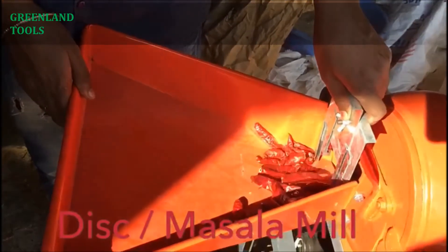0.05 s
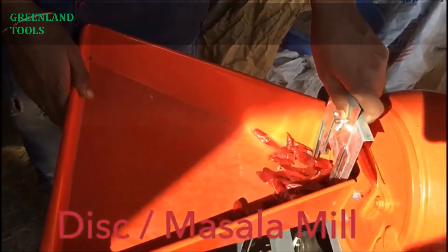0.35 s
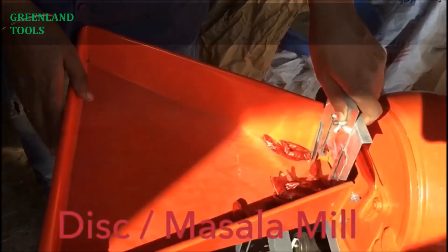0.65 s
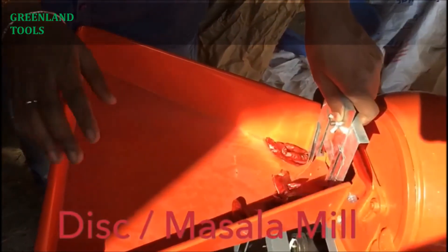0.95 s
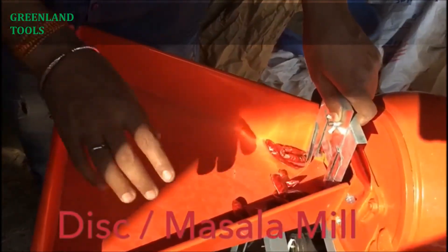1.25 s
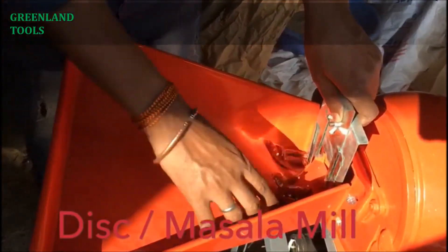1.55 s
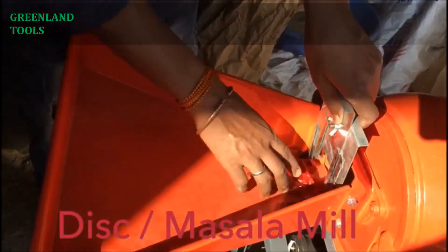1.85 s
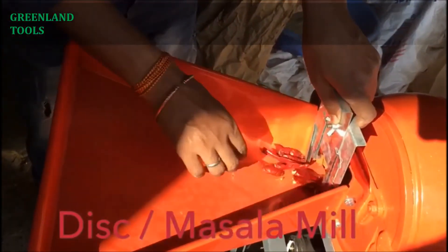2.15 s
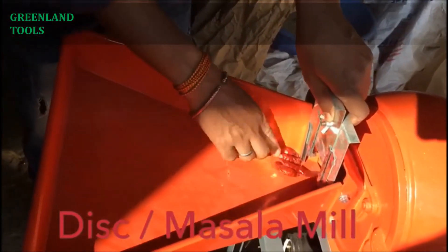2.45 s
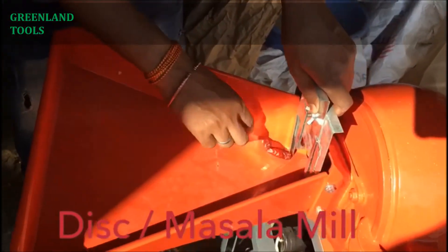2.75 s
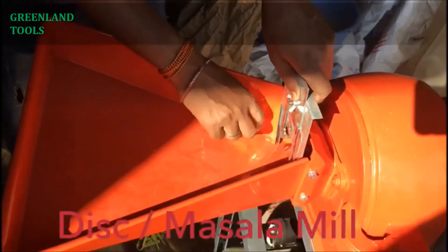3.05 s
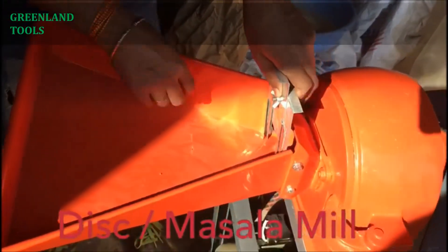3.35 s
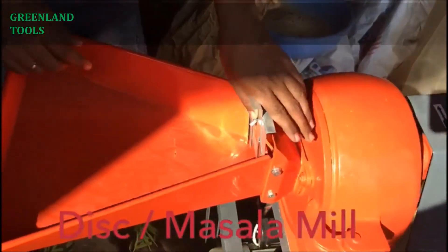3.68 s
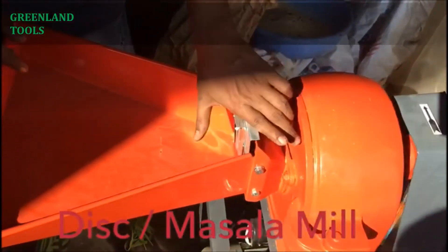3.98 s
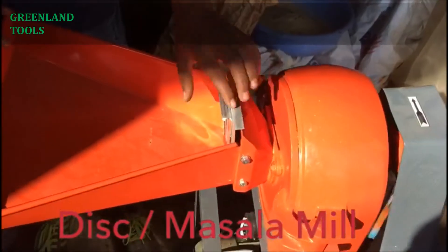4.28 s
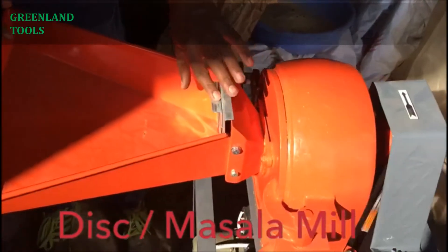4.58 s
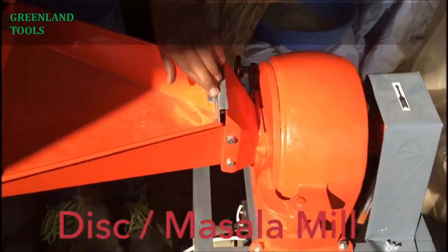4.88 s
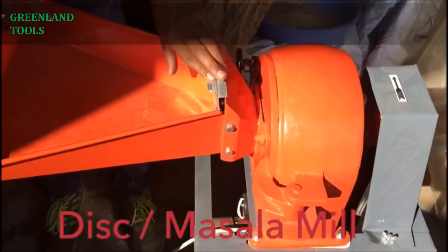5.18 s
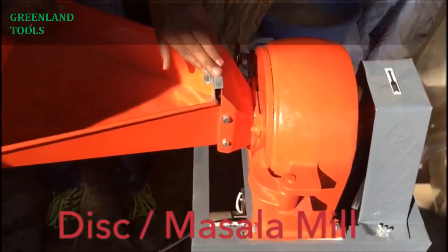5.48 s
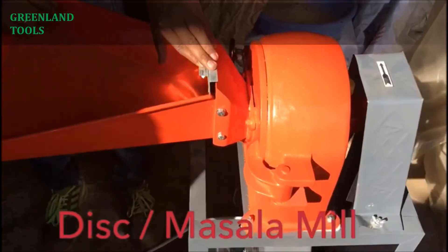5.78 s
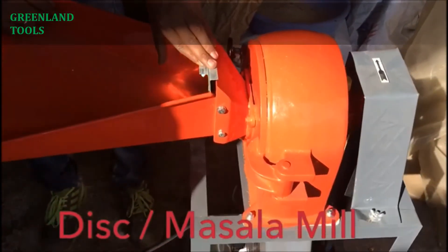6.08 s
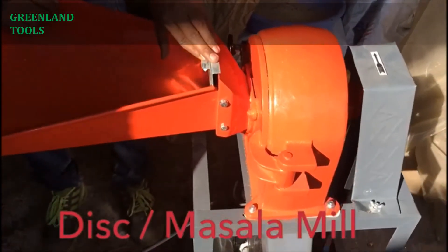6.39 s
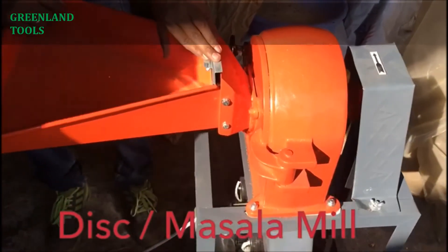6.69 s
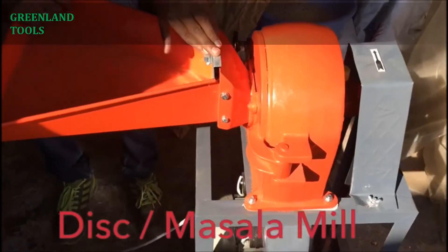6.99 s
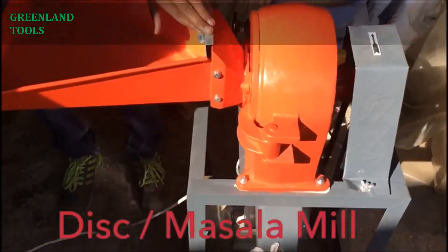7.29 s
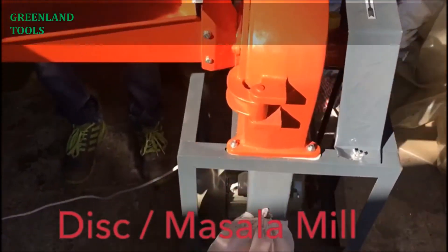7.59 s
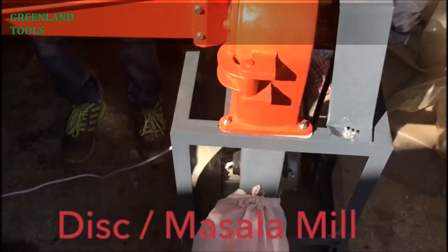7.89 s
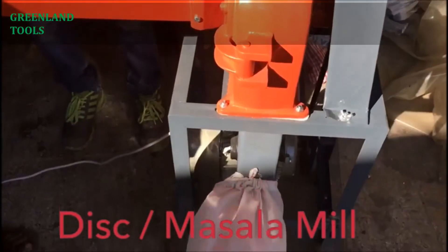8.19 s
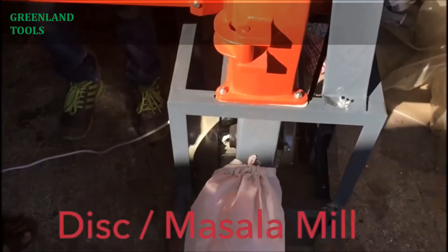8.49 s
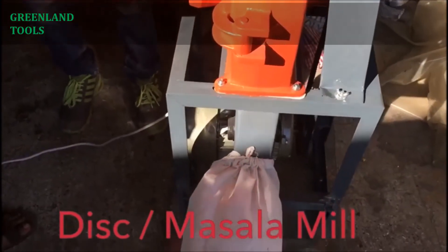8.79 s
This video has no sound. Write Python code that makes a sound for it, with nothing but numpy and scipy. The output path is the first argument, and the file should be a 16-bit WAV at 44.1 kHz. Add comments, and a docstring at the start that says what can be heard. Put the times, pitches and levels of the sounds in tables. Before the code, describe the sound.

An electric disc mill runs at full speed outdoors, with a steady motor hum, rushing air and many high whining tones. Dried chillies crunch in short bursts and fragments patter on steel for the first few seconds, then thin out, leaving the machine running nearly empty. One soft low bump comes midway. The close microphone moves along the mill, so different whines swell and fade.

```python
"""A belt-driven disc mill runs at full speed outdoors as the last dried chillies go down its hopper.
Rotor and motor hum, the bearings whine in many steady lines, and air roars through the grinding chamber.
Pods crunch and fragments patter on the steel, thinning out as the feed ends; one soft low bump sounds.
The microphone moves from above the hopper, over the housing, to the side of the frame,
passing through the peaks and nulls of each tone."""
import sys
import numpy as np
from scipy import signal
from scipy.fft import rfft, irfft
from scipy.io import wavfile
from scipy.ndimage import uniform_filter1d

SR = 44100
rng = np.random.default_rng(int(sys.argv[2]) if len(sys.argv) > 2 else 0)


def store_pcm(level_fs):
    """Save levels as 16-bit WAV."""
    pcm = np.round(np.clip(level_fs, -1, 1) * 32767).astype(np.int16)
    wavfile.write(sys.argv[1], SR, np.atleast_2d(pcm).T)


N = 394254
T = np.arange(N) / SR

# microphone move: time_s, place (0 hopper, 1 housing, 2 frame)
MIC_PATH = [(0, 0), (2.9, 0), (3.9, 1), (6.6, 1), (7.4, 2), (9, 2)]
# shaft speed, sagging a little under load: time_s, off_nominal_percent
SHAFT_SPEED = [(0, -.02), (1.6, -.01), (2.5, -.07), (3.6, 0), (6, .01), (9, .06)]
# air noise colours of the housing, the chamber and the grinding teeth: frequency_hz, relative_db
RUMBLE_EQ = [(15, -34), (30, -13), (45, -4.5), (100, -4.5), (170, -4), (250, 2.5), (310, 1), (375, 5.5),
             (430, 2.5), (490, -13), (900, -45)]
ROAR_EQ = [(300, -23.5), (480, -7), (570, -1), (760, 0.5), (980, -2), (1170, 4), (1350, -3), (1650, -1.5),
           (1870, 1.5), (2150, -3), (2800, -7), (3600, -25.5), (6000, -43)]
HISS_EQ = [(1500, -23), (2700, -8), (3300, 1.5), (3800, 2), (4300, 5), (4900, -1), (5700, -1.5),
           (6600, -5.5), (7300, -4), (8100, -2), (9200, -3), (10000, -7), (10400, -15)]
# level of the housing's rumble as the microphone moves: time_s, level_db
RUMBLE_LEVEL = [(0, -31.5), (.4, -24.5), (1.7, -29.5), (4.1, -28), (5.5, -29), (6.3, -32.5), (7.3, -29.5),
                (8.94, -32)]
# base levels of the roar and the hiss: hopper_db, housing_db, frame_db
ROAR_LEVELS = (-24.5, -24.5, -23.5)
HISS_LEVELS = (-22, -22.2, -23)
# the running gear chopping the air: rate_hz, relative_depth
AIR_CHOP = [(68.7, .06), (149.3, .07), (217.9, .1), (298.6, .09), (367.2, .12), (516.4, .07)]
# how much chilli is in the chamber: time_s, relative_db
CHILLI_FEED = [(0, 10), (.7, 10), (1.5, -18), (2.2, 6.5), (3.2, -15), (4.2, 4), (5.2, -15), (9, -38)]
# whole pods caught by the teeth: start_s, level_db
POD_CRUNCHES = [(.07, -21.5), (.19, -25), (.365, -30), (.39, -21), (.585, -21), (.676, -26), (.83, -28),
                (.975, -20), (1.135, -19), (1.31, -29), (1.955, -19), (2.125, -19), (2.415, -25),
                (2.84, -25), (3.115, -25)]
# a soft low bump: start_s, level_db, pitch_hz, rise_s
LOW_BUMP = (4.725, -22, 52, .018)
# bearing whine, before its trim: pitch_hz, hopper_db, housing_db, frame_db
BEARING_LINES = [(700, -44, -45, -42), (709, -44, -37, -39), (850, -46, -45, -43), (982, -44, -46, -45),
                 (1067, -35, -44, -37), (1191, -38, -43, -47), (1217, -41, -43, -45), (1350, -44, -45, -46),
                 (1434, -41, -41, -47), (1503, -38, -39, -37), (1567, -42, -43, -45), (1611, -40, -43, -44),
                 (1740, -40, -46, -36), (1984, -40, -48, -51), (2386, -43, -37, -47), (2502, -49, -40, -46),
                 (2755, -50, -43, -37), (2970, -44, -46, -45), (3338, -42, -38, -40), (3394, -48, -40, -41),
                 (3482, -37, -36, -40), (3528, -46, -38, -40), (3636, -39, -34, -41), (3740, -40, -39, -45),
                 (3918, -46, -39, -41), (3970, -42, -39, -39), (4071, -37, -34, -34), (4184, -36, -38, -38),
                 (4258, -37, -41, -46), (4548, -48, -48, -39), (4620, -43, -42, -44), (4739, -39, -34, -39),
                 (4917, -48, -34, -38), (4998, -44, -42, -41), (5105, -41, -39, -36), (5168, -42, -42, -47),
                 (5472, -45, -42, -42), (5539, -41, -46, -47), (7309, -53, -43, -47), (7372, -40, -45, -46),
                 (8113, -50, -43, -41), (8410, -52, -42, -44), (8847, -45, -43, -47)]
# rotor, belt and mains tones: pitch_hz, hopper_db, housing_db, frame_db
HUM_LINES = [(66.7,-47,-40.5,-41), (83.2,-41,-48,-47), (88.4,-27.5,-28.5,-30), (100.3,-37,-34,-36),
             (116.2,-44,-42.5,-48), (121.4,-38,-41,-48), (176.8,-38,-47,-57), (190.2,-45,-38,-39),
             (201.4,-52.5,-49,-42), (236,-42,-46,-50), (245,-35,-41.5,-47), (250.5,-48,-39.5,-42),
             (266,-28,-28.5,-32), (274.2,-30.5,-41,-53), (331.7,-33,-43,-53), (353.3,-42,-35.5,-34.5),
             (361.3,-34,-34.5,-41), (402,-40,-43.5,-56), (550,-51,-41.5,-40), (581.7,-45,-39.5,-43.5)]
# the mill's lead tones between swells, by name: pitch_hz, hopper_db, housing_db, frame_db
LEAD_LINES = {"drone": (149.4, -40, -42, -38), "moan": (918, -38, -41, -35),
              "low ring": (1136, -34, -34, -33), "high ring": (1284.8, -35, -35, -33),
              "low whine": (1801.4, -39, -35, -34), "whine": (1869.1, -32, -32, -32),
              "high whine": (2237, -38, -38, -40), "low song": (2535.6, -36, -36, -38),
              "song": (2608, -39, -38, -39), "high song": (2902.7, -36, -39, -41),
              "low chime": (3121, -42, -44, -38), "high chime": (3269, -37, -43, -37),
              "low whistle": (3704.5, -34, -34, -35), "whistle": (4002.5, -37, -32, -31),
              "low squeal": (4368.7, -33, -35, -35), "squeal": (4435.8, -32, -35, -31),
              "high squeal": (4802, -37, -41, -41), "wail": (1652, -37, -36, -42),
              "high wail": (2169, -42, -43, -41), "low sizzle": (7679, -43, -43, -40),
              "high sizzle": (7745, -46, -42, -40)}
# the microphone crossing a lead tone's beam: peak_s, line_name, length_s, peak_db
BEAM_CROSSINGS = [(.1, "whine", .6, -25), (.1, "high song", .6, -28), (.16, "squeal", .1, -25),
                  (.3, "low ring", .64, -26), (.83, "whine", .61, -19), (.88, "high chime", .25, -30),
                  (1.19, "squeal", .15, -21), (1.2, "squeal", .78, -22.5), (1.29, "low whistle", .35, -30),
                  (1.3, "low squeal", .52, -29), (1.34, "high chime", .3, -30),
                  (1.37, "high squeal", .46, -30), (1.6, "whine", .58, -20), (1.72, "low sizzle", .1, -30),
                  (1.94, "low whistle", .2, -25), (1.96, "song", .43, -30), (2.07, "squeal", .28, -28),
                  (2.08, "moan", 1.14, -30), (2.38, "whine", .42, -16.5), (2.44, "low whine", 1.7, -29),
                  (2.57, "squeal", .21, -24), (2.68, "whine", .22, -21.5), (2.81, "low sizzle", .11, -31),
                  (2.87, "low squeal", .15, -26), (3.09, "whine", .41, -18), (3.16, "low whistle", .6, -28),
                  (3.2, "drone", 1.4, -35), (3.25, "squeal", .53, -21.5), (3.42, "low squeal", .18, -25),
                  (3.55, "wail", 1.6, -31), (3.82, "whine", .35, -22), (3.95, "low squeal", .12, -24),
                  (3.94, "whistle", .17, -27), (4.11, "low chime", 1.12, -30),
                  (4.26, "low squeal", .22, -21), (4.45, "whistle", .46, -24), (4.56, "whine", .42, -22),
                  (4.55, "low whistle", .22, -26), (4.7, "low squeal", .87, -23),
                  (4.72, "squeal", .15, -24), (5.03, "squeal", .14, -25), (5.04, "high ring", .3, -28),
                  (5.05, "low song", .84, -30), (5.25, "whine", .82, -24), (5.54, "high sizzle", .9, -34),
                  (5.56, "low ring", .31, -29), (5.65, "drone", .63, -31), (5.74, "high ring", .47, -27),
                  (5.88, "whistle", .7, -28), (5.84, "low whine", .49, -23), (5.93, "whine", .42, -28),
                  (6.16, "high sizzle", .09, -32), (6.38, "low song", .21, -27),
                  (6.5, "low whine", .43, -24), (6.6, "whine", .46, -23), (6.55, "song", .9, -32),
                  (6.62, "high ring", .6, -30), (6.72, "whistle", .34, -22), (6.84, "squeal", .25, -24),
                  (7.15, "high whine", .42, -30), (7.16, "whistle", .43, -27),
                  (7.16, "high sizzle", .14, -31), (7.19, "drone", .39, -32),
                  (7.22, "low squeal", .36, -23), (7.27, "low sizzle", .37, -33),
                  (7.44, "high wail", .63, -31), (7.47, "whistle", .14, -19),
                  (7.57, "low sizzle", .11, -30), (7.83, "whistle", .2, -17.5),
                  (7.83, "high ring", .58, -29), (7.87, "squeal", .43, -28), (7.95, "low sizzle", .24, -32),
                  (8, "high song", .86, -31), (8.03, "high whine", .78, -32), (8.04, "whistle", .3, -21.5),
                  (8.08, "high chime", .36, -29), (8.57, "whine", .23, -27),
                  (8.61, "high sizzle", .88, -36), (8.69, "low squeal", .54, -25),
                  (8.77, "whistle", .43, -19.5), (8.86, "high whine", .24, -28)]


def amp(db):
    """Decibels to gain."""
    return 10 ** (np.asarray(db) / 20)


def unit(x):
    """Scales to rms 1."""
    return x / np.sqrt(np.mean(abs(x) ** 2) + 1e-20)


def curve(rows):
    """Joins (time_s, value) rows by straight ramps."""
    return np.interp(T, *np.transpose(rows))


def mic_gain(place_dbs):
    """Glides between the levels at the microphone's three places."""
    return curve([(time_s, amp(place_dbs[place])) for time_s, place in MIC_PATH])


def colour(x, eq):
    """Filters by a (frequency_hz, relative_db) curve; rms 1."""
    hz, db = np.transpose(eq)
    bins_hz = np.fft.rfftfreq(N, 1 / SR)
    gain = amp(np.interp(np.log(bins_hz + 1), np.log(hz), db))
    return unit(irfft(rfft(x) * gain, N))


def drift(rate_hz, size=2048):
    """Complex random wander of rms about 1, mostly slower than the rate."""
    hz = np.fft.fftfreq(size, T[-1] / size)
    noise = rng.standard_normal(size) + 1j * rng.standard_normal(size)
    slow = unit(np.fft.ifft(noise / (1 + (hz / rate_hz) ** 2)))
    return np.interp(T, np.linspace(0, T[-1], size), slow)


def waver(depth_db, rate_hz):
    """A gain that wanders around 1."""
    return amp(depth_db * unit(drift(rate_hz).real))


def hit_envelope(start_s, rise_s):
    """Climbs to 1 over the rise time, then dies away."""
    age = np.maximum(T - start_s, 0) / rise_s
    return age * np.exp(1 - np.minimum(age, 100))


def crackle(per_s, spread_db, eq):
    """Random snaps of uneven size; rms 1."""
    sizes = amp(spread_db * np.minimum(rng.exponential(1, N), 4))
    signs = rng.choice([-1, 1], N)
    snaps = rng.random(N) < per_s / SR
    return colour(sizes * signs * snaps, eq)


def tone(hz, clock, scatter, fade_hz):
    """A line tied to the shaft; reflections of shifting phase make it fade and waver."""
    field = (1 + scatter * drift(fade_hz)) / np.sqrt(1 + scatter ** 2)
    phase = 2 * np.pi * (hz * clock + rng.random())
    return np.sqrt(2) * (field.real * np.cos(phase) - field.imag * np.sin(phase))


def shimmer(x, depth_db, size=1024):
    """Reflections off nearby metal lift and dip patches of the spectrum as the microphone moves."""
    frames = signal.stft(x, nperseg=size)[2]
    patches = rng.standard_normal(frames.shape)
    for width in (9, 13):
        patches = uniform_filter1d(patches, size=width, axis=0)  # across frequency
        patches = uniform_filter1d(patches, size=width // 2, axis=1)  # across time
    return signal.istft(frames * amp(depth_db * unit(patches)), nperseg=size)[1][:N]


def air_bed(clock):
    """Turbulence around the disc: a rumble under roar and hiss that the running gear chops."""
    chop = sum(depth * np.cos(2 * np.pi * (hz * clock + rng.random())) for hz, depth in AIR_CHOP)
    low, mid, high = rng.standard_normal((3, N))
    rumble = amp(curve(RUMBLE_LEVEL)) * colour(low, RUMBLE_EQ)
    feed_lift = amp(0.052 * curve(CHILLI_FEED))  # chilli in the chamber lifts the roar
    roar = mic_gain(ROAR_LEVELS) * feed_lift * colour(mid * (1 + 1.2 * chop), ROAR_EQ)
    hiss = mic_gain(HISS_LEVELS) * colour(high * (1 + 0.51 * chop), HISS_EQ)
    return rumble + waver(depth_db=0.76, rate_hz=13) * shimmer(roar + hiss, depth_db=1.75)


def bump(start_s, level_db, pitch_hz, rise_s):
    """A dull low push, a few cycles long."""
    return amp(level_db) * hit_envelope(start_s, rise_s) * np.sin(2 * np.pi * pitch_hz * (T - start_s))


def chilli_patter(trim_db=-33):
    """Fragments patter on the steel housing in clumps, following the feed."""
    steel_eq = [(400, -36), (1100, 0.5), (2500, -5), (4300, 3.5), (7000, -6), (10000, 5)]
    clumps = unit(waver(depth_db=4, rate_hz=22))
    return amp(curve(CHILLI_FEED) + trim_db) * clumps * crackle(per_s=900, spread_db=1, eq=steel_eq)


def pod_crunches(rise_s=0.0092):
    """Each whole pod shatters on the teeth in a short dry burst."""
    husk_eq = [(1000, -26), (3000, 5), (5500, -0.5), (10000, -6), (11000, -29)]
    bursts = sum(amp(db) * hit_envelope(start_s, rise_s) for start_s, db in POD_CRUNCHES)
    return bursts * crackle(per_s=3300, spread_db=1.5, eq=husk_eq)


def bearing_overtones(clock, level_db=-48, spread_db=3, spacing_hz=367.4):
    """Rolling balls modulate the whine: four families of faint, evenly spaced lines climb the treble."""
    lowest_hz = [5073, 5107, 5175, 5207]
    lines_hz = np.add.outer(spacing_hz * np.arange(11), lowest_hz).ravel()
    dbs = level_db + spread_db * rng.uniform(-1, 1, len(lines_hz))
    return sum(amp(db) * tone(hz, clock, scatter=3.1, fade_hz=6) for hz, db in zip(lines_hz, dbs))


def bearing_whine(clock, trim_db=0.47):
    """The bearings sing in many lines, each fading in and out among reflections."""
    lines = (mic_gain(dbs) * tone(hz, clock, scatter=2.2, fade_hz=3.8) for hz, *dbs in BEARING_LINES)
    return amp(trim_db) * sum(lines)


def drive_hum(clock):
    """Rotor, belt and mains give the mill its steady body; neighbouring tones beat."""
    return sum(mic_gain(dbs) * tone(hz, clock, scatter=0.08, fade_hz=1.5) for hz, *dbs in HUM_LINES)


def beam(peak_s, length_s):
    """Steep rise, flat top and steep fall of a tone as the microphone crosses its beam."""
    across = np.linspace(-2, 2, 101)
    return np.interp(T, peak_s + across * length_s / 2, np.exp(-across ** 4))


def lead_tones(clock, scatter=0.62):
    """The mill's strongest lines flicker among reflections and turn loud and steady inside a beam."""
    mix = 0
    for name, (hz, *dbs) in LEAD_LINES.items():
        rest = mic_gain(dbs)
        beam_power = sum((amp(db) * beam(peak_s, length_s)) ** 2
                         for peak_s, line, length_s, db in BEAM_CROSSINGS if line == name)
        level = np.sqrt(rest ** 2 + beam_power)
        mix = mix + level * tone(hz, clock, scatter * rest / level, fade_hz=7)
    return mix


def scene():
    """Mixes the mill, the same on both channels; its tones and air chop follow one shaft."""
    clock = T + np.cumsum(curve(SHAFT_SPEED)) / 100 / SR  # time that runs at the shaft's pace
    gear = drive_hum(clock) + bearing_whine(clock) + lead_tones(clock) + bearing_overtones(clock)
    mill = gear + air_bed(clock) + chilli_patter() + pod_crunches() + bump(*LOW_BUMP)
    return np.array([mill, mill])


def record(dry):
    """A steep low-pass takes the top off the mix."""
    cutoff_hz = 10380
    low_pass = signal.firwin(601, cutoff_hz, window=("kaiser", 9), fs=SR)
    return signal.oaconvolve(dry, low_pass[None], "same")


dry = scene()
out = record(dry)
store_pcm(out)
```